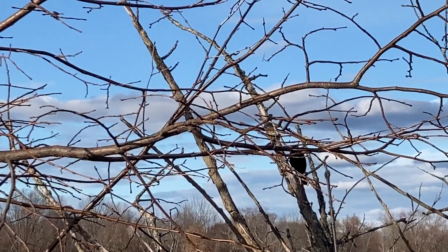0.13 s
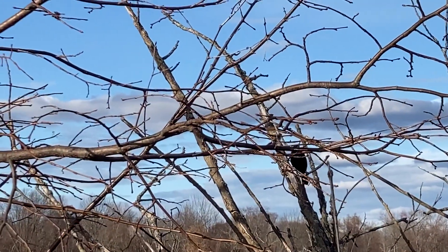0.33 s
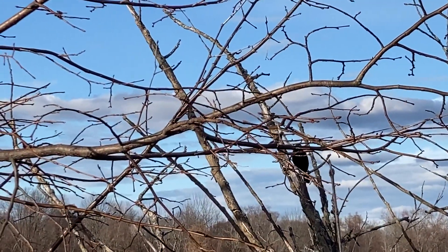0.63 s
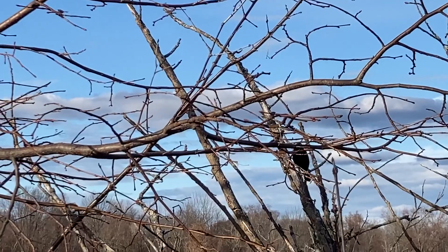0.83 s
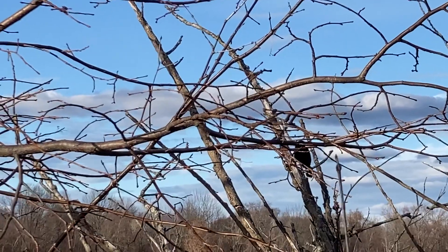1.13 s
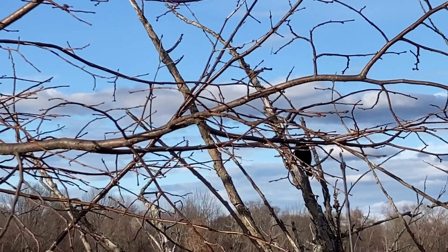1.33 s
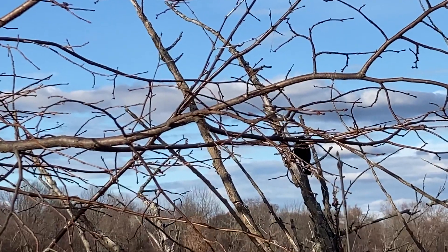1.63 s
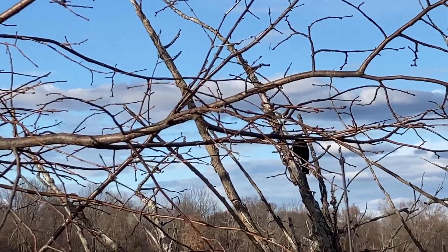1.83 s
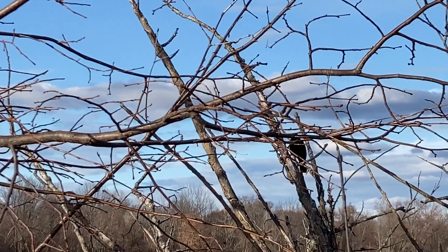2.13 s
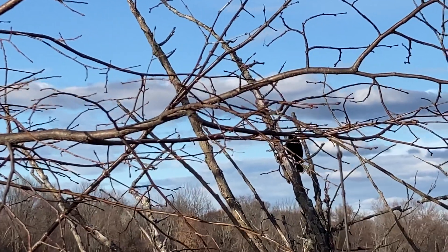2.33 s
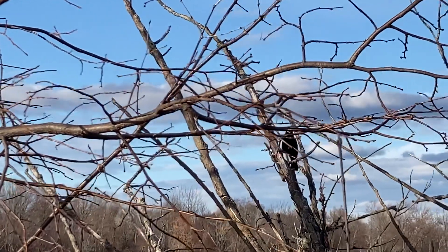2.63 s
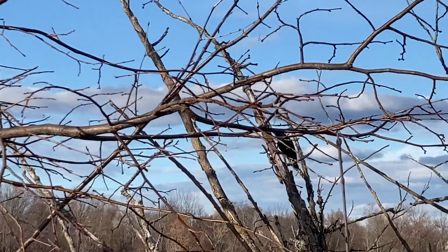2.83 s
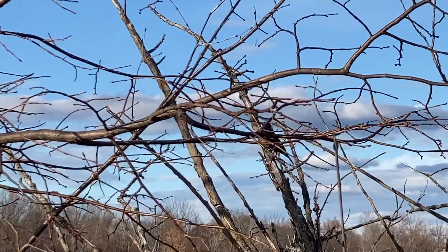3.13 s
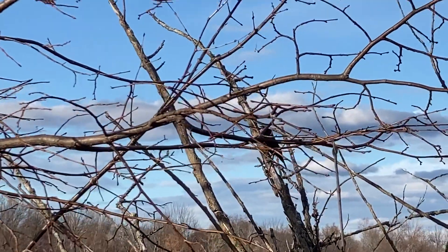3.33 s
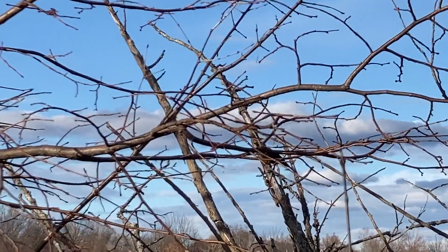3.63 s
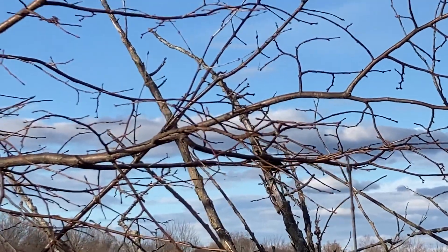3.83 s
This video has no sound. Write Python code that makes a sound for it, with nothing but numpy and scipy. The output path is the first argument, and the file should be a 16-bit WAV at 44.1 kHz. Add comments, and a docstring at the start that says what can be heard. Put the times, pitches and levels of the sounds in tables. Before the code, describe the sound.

A blackbird gives one sharp, raspy call close by at about 1.7 seconds, over a faint rumble of distant traffic and a few twig ticks. From 2.5 to 3.3 seconds a rapid buzzy trill comes from farther off, followed by a faint, distant whistle. Low wind buffets the microphone, building from 2 seconds onward with light crackling. The sound cuts out for an instant near 3.9 seconds.

```python
"""Among bare trees, with traffic rumbling in the distance. Close to the microphone a blackbird gives one
sharp check call, a whistle over a rasp; then, from farther off, comes a buzzy trill of rapid glides.
Both scatter off branches and trunks. Wind eddies buffet the microphone more and more; twigs tick and
crackle, and faint birds answer from far away. The sound drops out for an instant near the end."""
import sys
import numpy as np
from scipy import signal
from scipy.fft import rfft, irfft
from scipy.io import wavfile
from scipy.ndimage import uniform_filter1d

SR = 44100
rng = np.random.default_rng(int(sys.argv[2]) if len(sys.argv) > 2 else 0)


def store_wav(level_fs):
    """Save 16-bit WAV to argv[1]."""
    pcm = np.round(np.clip(np.atleast_2d(level_fs), -1, 1) * 32767)
    wavfile.write(sys.argv[1], SR, pcm.T.astype(np.int16))


N = 176400
T = np.arange(N) / SR
FREQS = np.fft.rfftfreq(N, 1 / SR)


def undb(db):
    """Decibels to gain."""
    return 10 ** (np.asarray(db) / 20)


def unit(x):
    """Scale to rms 1."""
    return x / np.sqrt(np.mean(x ** 2))


def curves(table):
    """Each column after the first as a line through time."""
    rows = np.array(table, float)
    return [np.interp(T, rows[:, 0], col) for col in rows[:, 1:].T]


def during(table):
    """One between the first and last row's times, else zero."""
    return (T > table[0][0]) & (T < table[-1][0])


def per_bin(points):
    """Read (Hz, value) points on a log-frequency axis."""
    hz, value = np.array(points, float).T
    return np.interp(np.log(FREQS + 1), np.log(hz), value)


def filtered(x, gain):
    """Apply a gain per frequency."""
    return irfft(rfft(x) * gain, N)


def noise(gain):
    """Noise of rms 1, coloured by a gain per frequency."""
    return unit(filtered(rng.standard_normal(N), gain))


def stereo_noise(gain, correlation):
    """Coloured noise with the given left-right correlation per frequency."""
    alike = np.clip(per_bin(correlation), -1, 1)
    mid, side = rfft(rng.standard_normal((2, N))) * gain * np.sqrt([1 + alike, 1 - alike])
    return unit(irfft(np.array([mid + side, mid - side]), N))


def wander(hz):
    """Smooth random motion of rms 1, up to about the given rate."""
    return noise(np.exp(-(FREQS / hz) ** 2))


def phase_of(hz):
    """Running phase of a frequency."""
    return 2 * np.pi * np.cumsum(hz) / SR


def burst(start, rise, decay):
    """Linear rise, exponential fall."""
    return np.clip((T - start) / rise, 0, 1) * np.exp(-np.maximum(T - start - rise, 0) / decay)


def delayed(x, seconds):
    """Delay a sound by shifting its phases."""
    return filtered(x, np.exp(-2j * np.pi * FREQS * seconds))


def woods(x, near_db, near_s, far_db, far_s, damp_hz, gap_s):
    """Scatter from nearby branches, then a faint, duller tail from the trees."""
    near, far = (unit(burst(gap_s, gap_s, decay)) / np.sqrt(N) for decay in (near_s, far_s))
    dull = 1 / np.sqrt(1 + (FREQS / damp_hz) ** 4)
    tails = [undb(near_db) * near * rng.standard_normal(N) + undb(far_db) * far * noise(dull)
             for _ in range(2)]
    return np.array([signal.fftconvolve(x, tail)[:N] for tail in tails])


def whine(hz=10000, level_db=-93, end_s=1.93):
    """A thin, barely audible tone under the first half."""
    tone = np.sin(phase_of(hz * (1 + .002 * wander(100))))
    return np.sqrt(2) * undb(level_db) * (T < end_s) * tone


# Spectrum of the distant road (frequency [Hz], relative level [dB])
TRAFFIC_SPECTRUM = [(15, -46.5), (25, -32.5), (48, -5.5), (75, 3), (102, -3), (120, -11), (367, -19.5),
                    (529, -22), (687, -21), (1540, -29.5), (5250, -57), (6140, -47.5), (9080, -72),
                    (9820, -59.5), (12800, -58), (16600, -100.5), (22000, -120)]
# Stereo image of the surroundings (frequency [Hz], left-right correlation [0-1])
AMBIENT_IMAGE = [(30, 1), (200, 0.67), (450, 0.88), (850, 0.64), (1500, 0), (12000, 0)]
def traffic(level_db=-46):
    """A gently wavering rumble from far away."""
    waver = undb(.8 * wander(12))
    return undb(level_db) * waver * stereo_noise(undb(per_bin(TRAFFIC_SPECTRUM)), AMBIENT_IMAGE)


# Crackle around the microphone (time [s], level [dB])
CRACKLE_LEVEL = [(0, -95), (1.85, -70.5), (2.1, -64), (2.4, -59), (3.3, -67), (3.6, -66.5), (4, -59.5)]
# Spectrum of its clicks (frequency [Hz], relative level [dB])
CRACKLE_SPECTRUM = [(200, -4.5), (600, 6.5), (1500, 9), (2600, -5.5), (4500, -23.5), (7000, -33),
                    (12000, -47)]
def crackle(clicks_per_s=170, spread_db=3):
    """Tiny random clicks of dry twigs and grass stirred by the wind."""
    level_db, = curves(CRACKLE_LEVEL)
    hits = rng.random(N) < clicks_per_s / SR
    clicks = hits * undb(spread_db * rng.standard_normal(N)) * rng.choice([-1, 1], N)
    panned = clicks * rng.uniform(0, 1, (2, N))
    return undb(level_db) * unit(filtered(panned, undb(per_bin(CRACKLE_SPECTRUM))))


def noise_bursts(table, rise_s):
    """Short bursts of noise, each in its own resonance."""
    out = np.zeros((2, N))
    for at, decay, hz, width, db in table:
        resonance = 1 / (1 + (2 * (FREQS - hz) / width) ** 2)
        out += undb(db) * burst(at, rise_s, decay) * stereo_noise(resonance, AMBIENT_IMAGE)
    return out


# Single twigs (time [s], decay [s], centre [Hz], bandwidth [Hz], level [dB])
TWIG_TICKS = [(.58, 0.02, 1620, 4180, -51), (.955, 0.14, 7200, 3000, -75.5),
              (1.0165, .0035, 1920, 5500, -46), (1.018, 0.006, 700, 300, -45),
              (1.03, 0.0039, 7200, 5000, -53), (1.558, 0.028, 6800, 3000, -75),
              (1.598, 0.0046, 6850, 7000, -66), (2.022, 0.0026, 1293, 1200, -61),
              (2.189, 0.0033, 1370, 1100, -44), (2.305, 0.003, 1264, 1000, -47),
              (2.926, .003, 7200, 1400, -60.5), (2.937, 0.0035, 7250, 1420, -52),
              (2.956, 0.0026, 7150, 1500, -50.5), (2.957, .003, 10700, 2500, -62),
              (3.271, .012, 7200, 2500, -69.5), (3.312, .003, 11500, 5000, -66.5),
              (3.595, .02, 10600, 5000, -69), (3.96, 0.0019, 1810, 5000, -41.5)]
def twigs():
    """Twigs tick with a sharp attack and a brief resonance."""
    return noise_bursts(TWIG_TICKS, rise_s=.00031)


def chirps(table, blur_rad):
    """Whistled notes that swell, glide and fade; phase blur roughens their tone."""
    out = np.zeros(N)
    for at, width, hz, glide, db in table:
        age = T - at
        phase = 2 * np.pi * age * (hz + glide * age / 2) + blur_rad * wander(300.8)
        out += undb(db) * np.exp(-(age / width) ** 2) * np.sin(phase)
    return out


# A far whistle that falls and rises again (time [s], pitch [Hz], level [dB])
FAR_WHISTLE = [(3.4, 4300, -67), (3.412, 4650, -55), (3.44, 3670, -66.5), (3.475, 3350, -61),
               (3.52, 3515, -69), (3.57, 3506, -66.5), (3.64, 3790, -65.5), (3.69, 3950, -82.5)]
# Clear far notes (time [s], width [s], pitch [Hz], glide [Hz/s], level [dB])
FAR_NOTES = [(1.285, 0.01, 2770, -4, -64), (1.315, .025, 3960, 0, -66.5),
             (1.333, 0.0072, 4570, 20000, -69.5), (3.435, 0.026, 4700, 0, -66.5),
             (3.575, 0.0053, 11600, -2, -70)]
# Hoarse far calls (time [s], decay [s], centre [Hz], bandwidth [Hz], level [dB])
FAR_CALLS = [(.48, 0.012, 3100, 1000, -64), (.66, 0.09, 3260, 895, -69.5), (.9, 0.12, 2750, 500, -69.5),
             (1.292, .035, 4260, 785, -67.5), (1.89, 0.064, 2680, 345, -62), (3.405, 0.03, 5080, 1800, -61),
             (3.43, 0.12, 2600, 1980, -57.5)]
def far_birds():
    """Distant birds: hoarse calls, and whistles that reach the microphone only by way of the trees."""
    hz, db = curves(FAR_WHISTLE)
    whistle = during(FAR_WHISTLE) * undb(db) * np.sin(phase_of(hz * (1 + .045 * wander(300))))
    voice = whistle + chirps(FAR_NOTES, blur_rad=.9)
    scatter = woods(voice, near_db=2, near_s=.017, far_db=-12, far_s=.1, damp_hz=5000, gap_s=.0012)
    return scatter + noise_bursts(FAR_CALLS, rise_s=.0079)


# Wind on the microphone (time [s], level [dB])
WIND_LEVEL = [(0, -53), (1.5, -59), (2.1, -43.5), (2.5, -37), (2.8, -34), (3.1, -32.5), (3.27, -36.5),
              (3.55, -32.5), (3.72, -34), (3.85, -32), (4, -32)]
# Spectrum of its eddies (frequency [Hz], relative level [dB])
EDDY_SPECTRUM = [(20, -23), (50, 7.5), (100, 4), (200, -14.5), (400, -21.5), (700, -28), (1400, -32.5),
                 (2500, -42), (4500, -56), (12000, -92)]
# Its stereo image (frequency [Hz], left-right correlation [0-1])
WIND_IMAGE = [(30, .98), (120, .988), (450, .99), (800, .9), (1500, .4), (2500, 0), (12000, 0)]
# Single buffets (time [s], decay [s], upper edge [Hz], level [dB])
BUFFETS = [(1.07, 0.042, 132, -29.5), (1.177, 0.011, 117, -34), (1.633, 0.042, 198, -35.5),
           (2.14, 0.0061, 304, -29.5), (2.215, 0.039, 170, -38.5), (2.36, 0.015, 226, -36),
           (2.459, 0.014, 230, -32), (2.599, 0.013, 303, -25.5), (2.624, 0.013, 133.5, -20),
           (2.689, 0.019, 207, -27.5), (2.769, 0.054, 183, -31.5), (2.831, 0.021, 347, -20),
           (2.884, 0.026, 148, -26.5), (2.948, 0.016, 264, -28.5), (2.981, 0.018, 310, -29),
           (3.045, 0.041, 196, -35.5), (3.111, 0.019, 211, -25.5), (3.19, 0.021, 230, -35.5),
           (3.333, 0.021, 181, -26), (3.443, 0.085, 160, -26.5), (3.502, 0.049, 280, -27),
           (3.546, 0.02, 520, -31), (3.634, 0.032, 380, -33), (3.68, 0.13, 144, -32),
           (3.778, 0.06, 307, -26.5), (3.8, 0.039, 248, -28.5), (3.901, 0.019, 410, -26),
           (3.939, 0.063, 253, -29.5)]
def wind(flutter_db=4.5, buffet_rise_s=.0027):
    """Eddies right on the microphone: a growing bass flutter and single thumps."""
    level_db, = curves(WIND_LEVEL)
    flow = stereo_noise(undb(per_bin(EDDY_SPECTRUM)), WIND_IMAGE)
    bass = filtered(flow, 1 / (1 + (FREQS / 700) ** 4))
    flutter = undb(flutter_db * np.tanh(wander(54)))
    out = undb(level_db) * (flow - bass + bass * flutter)
    thump_band = FREQS ** 3 / (FREQS ** 3 + 58 ** 3) / np.sqrt(1 + (FREQS / 170) ** 2)
    turbulence = stereo_noise(1, WIND_IMAGE)
    for at, decay, edge_hz, db in BUFFETS:
        swell = burst(at, buffet_rise_s, decay)
        puff = filtered(swell * turbulence, thump_band / np.sqrt(1 + (FREQS / edge_hz) ** 8))
        out += undb(db) * np.sqrt(np.mean(swell ** 2)) * unit(puff)
    return out


def glides(notes, cycle, rate, pitch_factor, jitter=.009, spread_db=2.8):
    """Short gliding notes, repeated almost exactly in every cycle."""
    out = np.zeros(N)
    for centre, width, hz, glide, db in notes:
        age = ((cycle - centre + .5) % 1 - .5) / rate  # seconds from the note's centre
        phase = 2 * np.pi * age * (hz * pitch_factor + glide * age / 2)
        phase += phase_of(hz * jitter * wander(400))
        out += undb(db + spread_db * wander(65)) * np.exp(-(age / width) ** 2) * np.sin(phase)
    return out


# Notes leading into the trill (time [s], width [s], pitch [Hz], glide [Hz/s], level [dB])
LEAD_IN = [(2.539, 0.0051, 2217, 59998, -39.5), (2.549, 0.039, 2546, 3998, -60.5),
           (2.57, 0.024, 5170, 7, -65), (2.584, 0.0082, 5057, -5, -41.5), (2.61, 0.0066, 4900, -9, -55.5)]
# Levels of the trill's parts (time [s], rising notes [dB], held note [dB], high voice [dB])
TRILL_LEVELS = [(2.6, -54.5, -63, -46), (2.63, -46.5, -46, -49.5), (2.72, -47, -47.5, -52),
                (2.8, -47.5, -51, -49), (2.95, -46.5, -50.5, -50.5), (3.05, -48.5, -48, -50),
                (3.13, -49, -45, -51.5), (3.325, -51.5, -47.5, -52), (3.345, -62, -53.5, -67.5)]
# The trill slows slightly (time [s], rate [cycles/s], low voice's pitch factor [ratio])
TRILL_PACE = [(2.6, 51, .99), (2.72, 49.5, .995), (2.8, 48, 1), (2.95, 47.6, 1.03), (3.1, 47.1, .99),
              (3.2, 48.6, .977), (3.33, 47.4, .97)]
# Notes of one cycle (centre [cycles], width [s], base pitch [Hz], glide [Hz/s], relative level [dB])
RISING_NOTES = [(.59, .0018, 2840, 213000, 6), (0.29, 0.00047, 2100, 60000, -2.5)]
HELD_NOTES = [(.85, 0.0052, 2775, -8000, 1.6)]
HIGH_NOTES = [(.09, 0.0033, 5100, 20003, -3), (.23, 0.00067, 4670, -400000, 4.5),
              (.31, .0018, 3850, -120000, 1.5), (.6, 0.0027, 3870, 200000, 2)]
# Breathy rasp of the high voice (frequency [Hz], relative level [dB])
TRILL_RASP = [(1800, -22.5), (2500, 3.5), (3250, -7.5), (3850, 0), (4500, 0), (5300, -0.5), (5700, -25),
              (7000, -52)]
# Echoes off trunks and ground (left delay [s], right delay [s], gain [ratio])
TRILL_ECHOES = [(.0031, .0032, 0.45), (.0066, 0.0057, 0.34)]
def trill(rasp_db=-10.5, right_lag_s=.00041):
    """Farther off, two voices trade glides: the high one snaps down, the low one rises and holds."""
    rising_db, held_db, high_db = curves(TRILL_LEVELS)
    rate, pitch_factor = curves(TRILL_PACE)
    cycle = np.cumsum(rate * (T > TRILL_PACE[0][0])) / SR
    breath = 1 + np.cos(2 * np.pi * (cycle - HIGH_NOTES[1][0]))  # peaks on the downward snap
    rasp = undb(rasp_db) * noise(undb(per_bin(TRILL_RASP))) * breath
    rising = undb(rising_db) * glides(RISING_NOTES, cycle, rate, pitch_factor)
    held = undb(held_db) * glides(HELD_NOTES, cycle, rate, pitch_factor)
    high = undb(high_db) * (glides(HIGH_NOTES, cycle, rate, pitch_factor=.96) + rasp)
    voice = during(TRILL_LEVELS) * (rising + held + high) + chirps(LEAD_IN, blur_rad=.25)
    echoes = sum(gain * np.array([delayed(voice, left), delayed(voice, right)])
                 for left, right, gain in TRILL_ECHOES)
    scatter = woods(voice, near_db=-4, near_s=.0096, far_db=-12.5, far_s=.084, damp_hz=4960, gap_s=.003)
    return np.array([voice, delayed(voice, right_lag_s)]) + echoes + scatter


# The close check call (time [s], whistle pitch [Hz], whistle level [dB], rasp level [dB])
CHECK_CALL = [(1.7092, 6140, -44, -53.5), (1.7108, 5710, -38, -48), (1.7128, 4730, -38, -45),
              (1.714, 4140, -33, -34), (1.724, 3796, -22, -33.5), (1.735, 3874, -24.5, -34),
              (1.744, 3825, -28.5, -34.5), (1.75, 4660, -35.5, -33), (1.755, 4690, -27.5, -36.5),
              (1.761, 3900, -39.5, -39.5), (1.771, 3756, -36.5, -52.5), (1.775, 3800, -54, -64)]
# The buzz under its whistle (time [s], pitch [Hz], pitch jitter [ratio], noise share [0-1])
CHECK_BUZZ = [(1.712, 590, .012, .5), (1.721, 555, .003, .2), (1.742, 545, .004, .2),
              (1.749, 450, .045, .45), (1.76, 340, .05, .6), (1.77, 300, .06, .7)]
# Spectrum of its rasp (frequency [Hz], relative level [dB])
CHECK_RASP = [(900, -24), (1700, -23), (2200, -3), (2750, -4.5), (3300, 4.5), (3850, 1.5), (4400, -2),
              (5200, -1.5), (6500, -8.5), (7200, 0), (8400, -15.5), (10200, -10), (11600, -2), (13000, -17),
              (14500, -23)]
def check_call(third_harmonic_db=-13, echo_db=-28, echo_s=.057, left_lag_s=.00002):
    """The blackbird, close by: a whistle drops into place over a buzz and breaks up as the buzz sags."""
    whistle_hz, whistle_db, rasp_db = curves(CHECK_CALL)
    buzz_hz, jitter, noise_share = curves(CHECK_BUZZ)
    waver = 1 + jitter * wander(900)
    phase = phase_of(buzz_hz * waver)
    colour_hz, colour_db = np.array(CHECK_RASP, float).T
    buzz = np.zeros(N)
    for k in range(2, 33):
        gain = undb(np.interp(k * buzz_hz, colour_hz, colour_db))
        buzz += gain * np.sin(k * phase + rng.uniform(0, 2 * np.pi))
    breath = noise(undb(per_bin(CHECK_RASP))) * (1 + .5 * np.cos(phase))
    rasp = np.sqrt(1 - noise_share) * unit(buzz) + np.sqrt(noise_share) * breath
    rasp += undb(third_harmonic_db) * np.sin(3 * phase)
    whistle = np.sqrt(2) * undb(whistle_db) * np.sin(phase_of(whistle_hz * waver))
    voice = during(CHECK_CALL) * (whistle + undb(rasp_db) * rasp)
    # The call comes back once from the trees, mostly its whistle.
    reflected = during(CHECK_CALL) * (whistle + undb(rasp_db - 10) * rasp)
    echo = undb(echo_db) * delayed(reflected, echo_s)
    scatter = woods(voice, near_db=-9.5, near_s=.0086, far_db=-23, far_s=.053, damp_hz=5570, gap_s=.0065)
    return np.array([delayed(voice, left_lag_s), voice]) + echo + scatter


def scene():
    """Everything that meets the stereo microphone."""
    birds = check_call() + trill() + far_birds()
    return birds + twigs() + crackle() + wind() + traffic() + whine()


def record(dry, dropout_s=(3.881, 3.904), dropout_db=-37, top_hz=13000):
    """The sound drops out for an instant near the end; the recorder cuts the top."""
    dropout = (T > dropout_s[0]) & (T < dropout_s[1])
    gate = 1 - uniform_filter1d(dropout.astype(float), size=12)
    lowpass = signal.ellip(8, .2, 70, top_hz, fs=SR, output="sos")
    return signal.sosfilt(lowpass, dry * np.maximum(gate, undb(dropout_db)))


dry = scene()
out = record(dry)
store_wav(out)
```